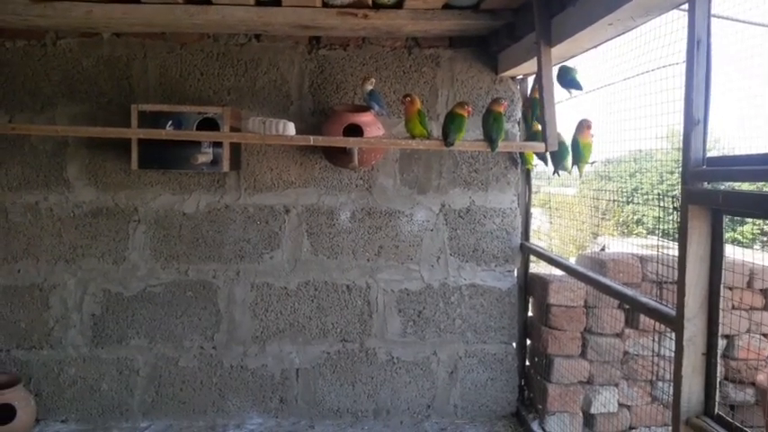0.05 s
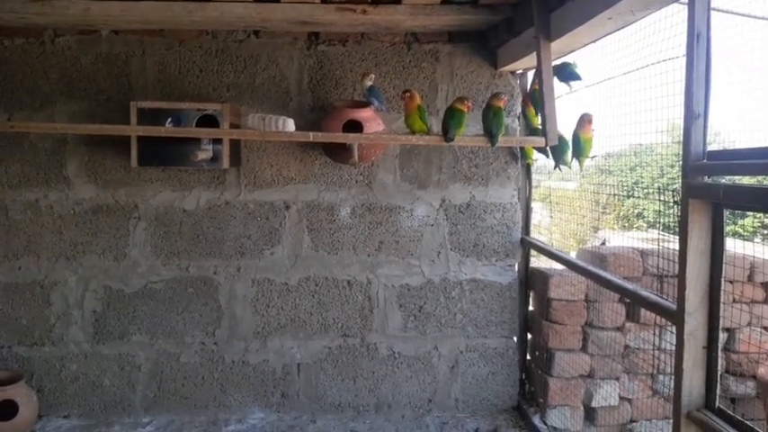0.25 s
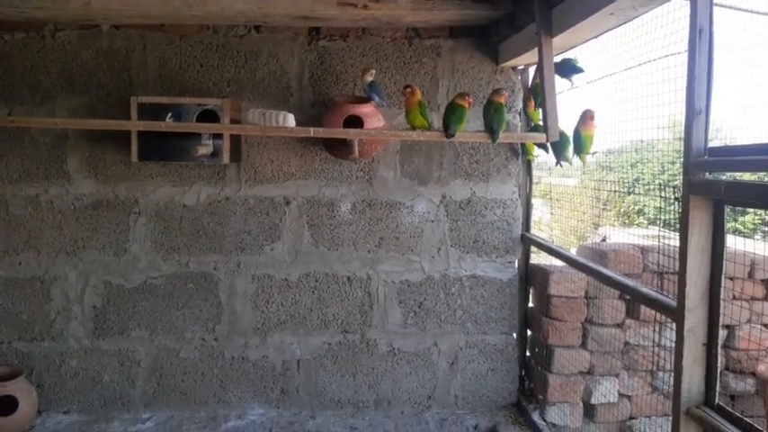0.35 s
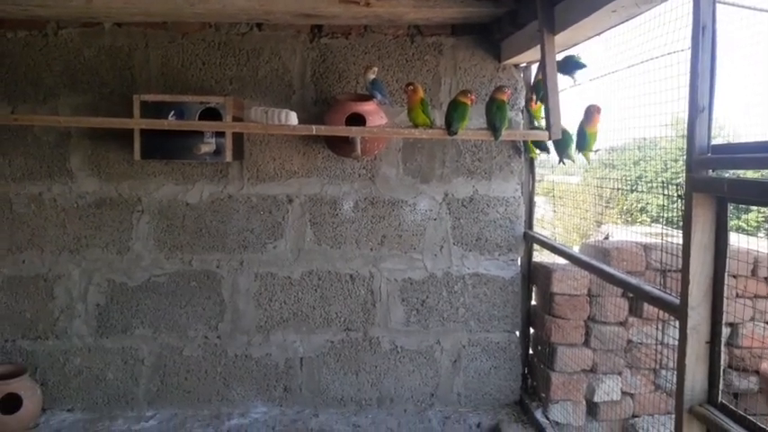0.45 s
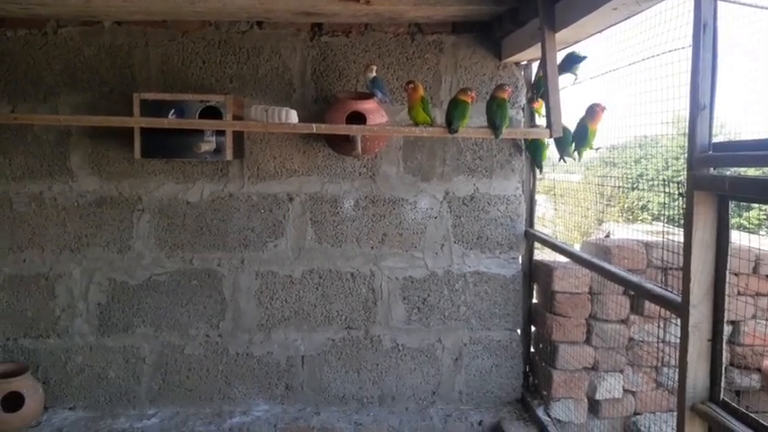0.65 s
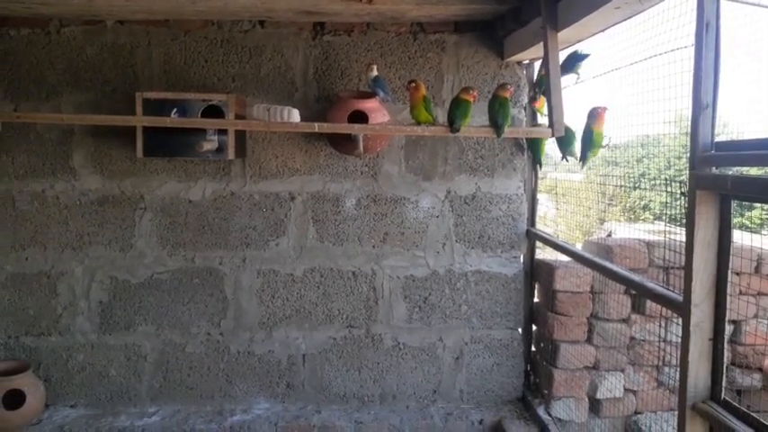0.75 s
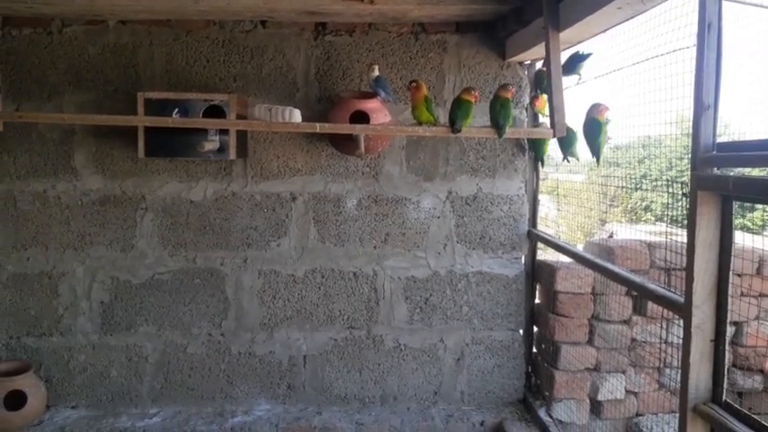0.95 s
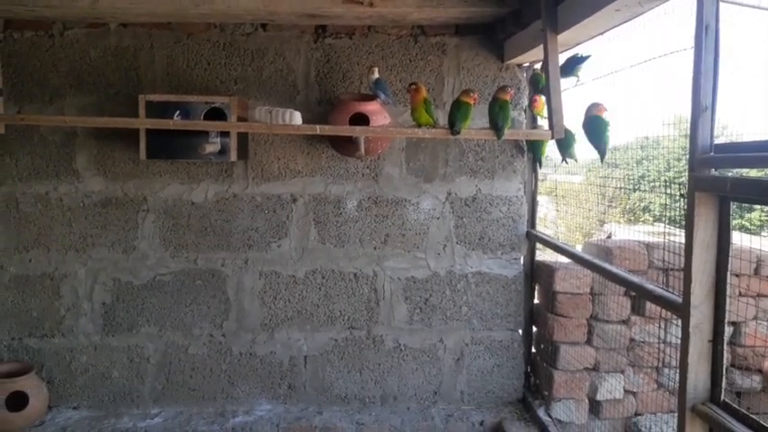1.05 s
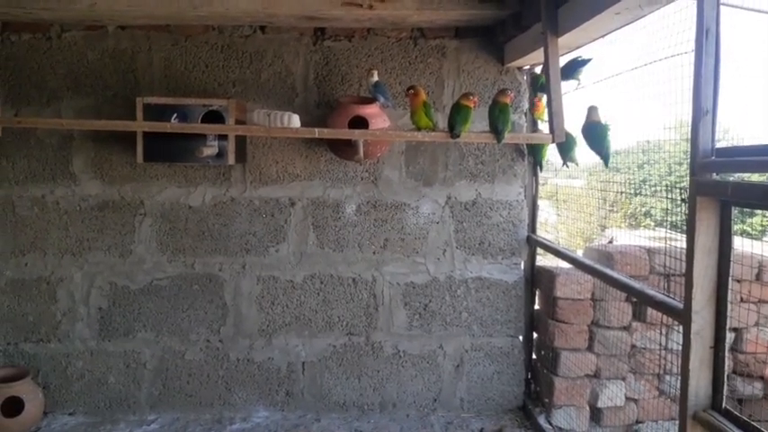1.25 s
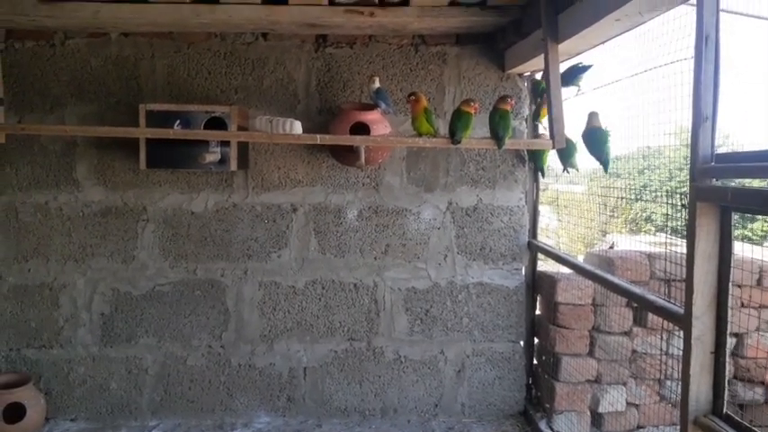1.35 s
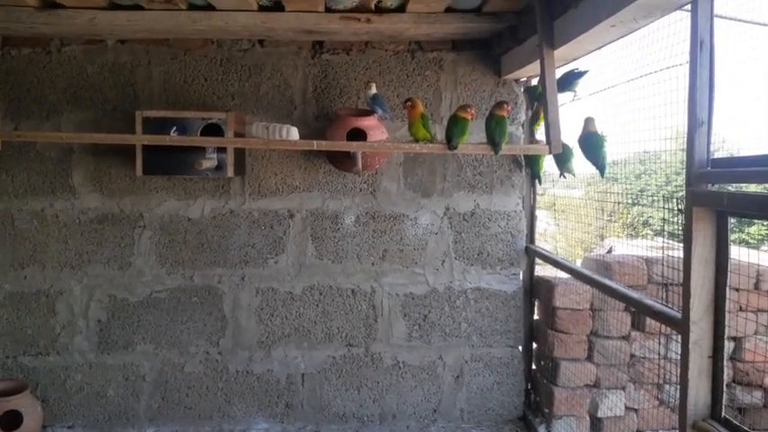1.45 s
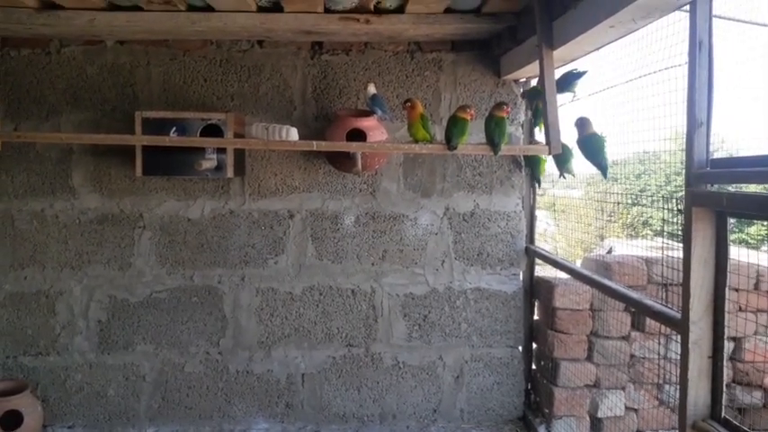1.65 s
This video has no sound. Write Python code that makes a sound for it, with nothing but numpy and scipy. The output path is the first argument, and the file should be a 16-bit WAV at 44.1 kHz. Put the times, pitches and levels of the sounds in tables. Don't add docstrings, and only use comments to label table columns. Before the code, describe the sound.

Small parrots on a perch to the right give clear tweets, then a dense burst of burry, hoarse chirps and shrill rising shrieks; they hush, leaving feather rustles and a distant squawk in a hard-walled aviary.

```python
import sys
import numpy as np
from scipy import signal
from scipy.io import wavfile
from scipy.ndimage import uniform_filter1d, minimum_filter1d

SR = 44100
rng = np.random.default_rng(int(sys.argv[2]) if len(sys.argv) > 2 else 0)


def volts_from_decibels(level):
    exponent = np.asarray(level, float) / 20
    return 10 ** exponent


def persist_wave(psi):
    counts = np.round(np.clip(psi, -1, 1) * 32767).astype(np.int16)
    wavfile.write(sys.argv[1], SR, np.atleast_2d(counts).T)


N = 74970


def rms_one(x):
    return x / np.sqrt(np.mean(x ** 2) + 1e-20)


def at_hz(points, hz):
    table_hz, value = np.array(points).T
    return np.interp(np.log(hz), np.log(table_hz), value)


def drift(rate_hz, order=2):
    run_in = 9000
    lowpass = signal.butter(order, rate_hz, fs=SR, output="sos")
    return rms_one(signal.sosfilt(lowpass, rng.standard_normal(N + run_in))[run_in:])


def gate(t, length, attack, release):
    return np.clip(t / attack, 0, 1) * np.exp(-np.maximum(t - length, 0) / release)


# frequency in Hz, left-right likeness (1 is mono).
LIKENESS = [(30, 0.6), (125, 0.95), (300, .6), (600, 0.5), (1500, 0.036), (15000, 0.036)]


def banded_noise(spectrum, patchy_db):
    out, white = 0, rng.standard_normal((2, 2, N))
    edges = 28 * 2 ** np.arange(0, 9.6, .5)
    for k, (low, high) in enumerate(zip(edges, edges[1:])):
        band = signal.butter(2, [low, high], "band", fs=SR, output="sos")
        mid, side = signal.sosfilt(band, white[k % 2])
        hz = np.sqrt(low * high)
        alike = np.clip(at_hz(LIKENESS, hz), -1, 1)
        gain = volts_from_decibels(at_hz(spectrum, hz) + patchy_db * drift(7.8))
        out = out + gain * (np.sqrt(1 + alike) * mid + np.sqrt(1 - alike) * side * [[1], [-1]])
    return rms_one(out)


# frequency in Hz, level in dB per Hz.
AIR_COLOUR = [(30, -13), (50, 1), (200, -9.5), (700, -9.5), (1500, -15), (3000, -25.5), (7000, -41),
              (15500, -31.5)]


def outdoor_air():
    return volts_from_decibels(-63.5) * banded_noise(AIR_COLOUR, patchy_db=4.5)


# frequency in Hz, level in dB.
HUM = [(50, -69), (100, -64.5), (200, -73)]


def mains_hum():
    t = np.arange(N) / SR
    return sum(volts_from_decibels(db + 0.83 * drift(6)) * np.sin(2 * np.pi * hz * t + 0.404 * drift(6)) for hz, db in HUM)


def cricket():
    t = np.arange(N) / SR
    pitch_hz, sag_hz_per_s, strokes_per_s = 4313, 8.5, 59.5
    phase = 2 * np.pi * np.cumsum(pitch_hz - sag_hz_per_s * t + 1.4 * drift(22)) / SR
    stroke = np.exp(-2j * np.pi * strokes_per_s * t)
    throb = 1 + .5 * stroke - .2 * stroke ** 2
    wing = throb * (volts_from_decibels(-69.5) * np.exp(1j * phase) + volts_from_decibels(-69) * np.exp(3j * phase))
    return np.array([wing.real, 0.3 * wing.imag])


# start in seconds, length in seconds, level in dB.
SWELLS = [
    (.0, 0.053, -63),
    (0.374, 0.41, -65.5),
    (0.877, 0.33, -63),
    (1.385, 0.3, -65),
]
# frequency in Hz, level in dB per Hz.
SWELL_COLOUR = [(60, -18.5), (150, 3.5), (300, -12), (600, -4), (1100, -23.5), (2000, -35.5),
                (15000, -64.5)]


def traffic_swells():
    t = np.arange(N) / SR
    level = sum(volts_from_decibels(db) * gate(t - start, length, 0.052, 0.02) for start, length, db in SWELLS)
    return level * banded_noise(SWELL_COLOUR, patchy_db=4.0)


# start in seconds,
# length in seconds, level in dB, brightest Hz.
RUSTLES = [(0.832, 0.048, -56.5, 3450), (0.96, 0.05, -73, 4956), (1.025, 0.06, -73, 5250),
           (1.107, 0.022, -57, 5860), (1.139, 0.027, -68.5, 5500), (1.368, 0.005, -62, 3410),
           (1.399, 0.017, -47, 5530), (1.43, 0.073, -56.5, 2780), (1.542, 0.058, -74, 4600),
           (1.621, 0.041, -63, 3460), (.0, 0.084, -54.5, 1800), (.62, 0.19, -69, 4565),
           (.88, .025, -68.5, 8670), (0.771, 0.436, -72, 2500), (1.5, 0.31, -72, 2600)]
# frequency in Hz, level in dB per Hz.
RUSTLE_COLOUR = [(500, -12), (1500, -7), (2500, -5), (6200, -5), (7500, -15), (10000, -20), (15500, -20)]


def rustles():
    t, out = np.arange(N) / SR, 0
    noise = volts_from_decibels(1.7 * drift(440)) * banded_noise(RUSTLE_COLOUR, patchy_db=4.5)
    for start, length, db, bright_hz in RUSTLES:
        bright = signal.lfilter(*signal.iirpeak(bright_hz, 2, fs=SR), noise)
        out = out + volts_from_decibels(db) * gate(t - start, length, 0.0048, 0.011) * (0.51 * noise + bright)
    return out


def voice(calls, overtones_db, glide, wobble, flutter_db, rough_hz, breath_db, left_db,
          fade_db=-5.0, attack=.002, throat=((1, 0), (2, 0))):
    t, out = np.arange(N) / SR, np.zeros(N)
    for start, length, first_hz, last_hz, db in calls:
        part = np.clip((t - start) / length, 0, 1)
        path_hz = last_hz + (first_hz - last_hz) * (1 - part) ** glide
        phase = 2 * np.pi * np.cumsum(path_hz * (1 + wobble * drift(rough_hz, order=4))) / SR
        tone = 0
        for k, overtone_db in enumerate(overtones_db, 1):
            tone = tone + volts_from_decibels(overtone_db + at_hz(throat, k * path_hz)) * np.cos(k * phase)
        air = volts_from_decibels(breath_db) * (1 + np.cos(phase)) * np.diff(rng.standard_normal(N + 1))
        level = volts_from_decibels(db + fade_db * part + flutter_db * drift(rough_hz, order=4))
        out += level * gate(t - start, length, attack, .004) * (tone + air)
    return out * volts_from_decibels(np.array([[left_db], [0]]))


# start in seconds, length in seconds, first pitch in Hz, last pitch in Hz, level in dB.
COO = [
    (.46, 0.29, 1021, 891, -56),
]


def far_coo():
    return voice(COO, [0, -30], .7, 0.0046, 4.8, 44, -72.5, 7.0, fade_db=-16.0, attack=0.035)


# start in seconds, length in seconds, first pitch in Hz, last pitch in Hz, level in dB.
SQUAWK = [
    (1.395, .016, 1724, 1681, -44.5),
    (1.404, .078, 1720, 1384, -49),
]
# frequency in Hz, gain in dB.
THROAT = [(1300, 2), (2800, 10), (4100, -2.5), (5400, 8), (7000, -7.5), (8500, -18), (12000, -21),
          (16000, -24.5)]


def far_squawk():
    onset_db = [-6.5, -9, 3.5, 9, 0, -11, 5.5, 2.5, 5.5]
    onset = voice(SQUAWK[:1], onset_db, 3.8, .02, 4.0, 450, -29.5, -12, throat=THROAT)
    fall = voice(SQUAWK[1:], [0] * 11, 7.1, 0.018, 4.95, 280, -17.5, -14.5, fade_db=-12.0, throat=THROAT)
    return onset + fall


# start in seconds, length in seconds, first pitch in Hz, last pitch in Hz, level in dB.
HOOT = [
    (.469, .011, 2150, 2110, -34),
]


def hoot():
    return voice(HOOT, [0, -40], 1.3, 0.0074, 0.58, 180, -65.5, -16)


# start in seconds, length in seconds, first pitch in Hz, last pitch in Hz, level in dB.
CHATTERS = [
    (.112, .022, 1500, 2551, -33.5),
    (.218, 0.025, 1890, 2539, -29.5),
    (.431, .024, 2490, 3200, -27),
    (.505, .07, 2290, 3093, -31),
]
CHATTER_DB = [0, -3.5, -11, -28, -21, -37]


def chatters():
    return voice(CHATTERS, CHATTER_DB, 3.0, 0.089, 1.61, 600, -32.5, -18.5, fade_db=1.5, attack=0.016)


# start in seconds, length in seconds, first pitch in Hz, last pitch in Hz, level in dB.
BURRS = [
    (.322, .03, 3600, 3500, -26),
    (.329, .038, 4150, 3700, -19),
    (.36, .045, 3650, 3420, -27),
    (.255, .03, 4250, 3950, -24),
    (.443, .047, 4150, 3880, -22),
    (.546, .038, 4850, 4550, -18),
    (.527, .04, 2550, 3050, -27),
]
BURR_DB = [3.5, -22, -27.5, -46.5]


def burrs():
    return voice(BURRS, BURR_DB, 1.4, .022, 2.7, 450, -57, -18, attack=0.014)


# start in seconds, length in seconds, first pitch in Hz, last pitch in Hz, level in dB.
TWEETS = [
    (.043, .032, 4400, 4050, -26),
    (.134, .034, 4300, 3980, -25),
    (-.02, .022, 4750, 4700, -45),
    (.307, .015, 1900, 1870, -50),
    (.488, .018, 3820, 3780, -25),
    (.585, .014, 4500, 4400, -19),
]
TWEET_DB = [5, -15.5, -22, -37]


def tweets():
    return voice(TWEETS, TWEET_DB, 1.6, 0.014, 2.1, 500, -52, -19.5)


# start in seconds, length in seconds, first pitch in Hz, last pitch in Hz, level in dB.
RASPS = [
    (.232, .03, 5200, 4300, -17),
    (.386, .022, 7300, 6700, -26),
    (.432, .04, 4700, 4200, -24),
    (.43, .018, 5900, 5200, -22),
]
RASP_DB = [4.5, -16.5, -18]


def rasps():
    return voice(RASPS, RASP_DB, 1.6, .07, 2.4, 900, -42.5, -21.5, fade_db=-8.0, attack=0.0082)


# start in seconds, length in seconds, first pitch in Hz, last pitch in Hz, level in dB.
SHRIEKS = [
    (.397, 0.037, 4360, 5950, -9),
    (.504, .018, 4410, 5875, -14),
    (.508, 0.029, 4530, 4820, -14),
    (.525, 0.021, 5785, 5820, -18.5),
]
SHRIEK_DB = [3.5, -17]


def shrieks():
    return voice(SHRIEKS, SHRIEK_DB, 4.636, .028, 4.6, 500, -26.5, -17.5, fade_db=-7.0, attack=0.011)


def aviary(x):
    t = np.arange(SR // 2) / SR
    early_t60_s, wall_t60_s = 0.083, 1
    noise = rng.standard_normal((2, 2, len(t)))
    sparse = rng.random((2, len(t))) < 500 * (1 + t / .02) / SR
    early = sparse * noise[0] * volts_from_decibels(-60 * t / early_t60_s) * (t > .002)
    late = noise[1] * volts_from_decibels(-60 * t / wall_t60_s) * (t > .01)
    tail = 0
    for echo, db in ((early, -4.5), (late, -36.5)):
        tail = tail + volts_from_decibels(db) * echo / np.sqrt(np.sum(echo ** 2, axis=1, keepdims=True))
    tail = signal.sosfilt(signal.butter(1, 9550, fs=SR, output="sos"), tail)
    tail = tail * volts_from_decibels(np.array([[-5], [0]]))
    return signal.fftconvolve(x[1:], tail, axes=1)[:, :N]


def ports(x):
    lag_s = 0.000099
    late = np.interp(np.arange(N) - lag_s * SR, np.arange(N), x[0])
    treble = signal.sosfilt(signal.butter(2, 8450, "high", fs=SR, output="sos"), late)
    return np.array([late + volts_from_decibels(3.5) * treble, x[1]])


def scene():
    near = hoot() + chatters() + burrs() + tweets() + rasps() + shrieks()
    calls = near + far_coo() + far_squawk()
    birds = ports(calls + aviary(calls))
    return outdoor_air() + mains_hum() + cricket() + traffic_swells() + rustles() + birds


def limiter(x):
    room = np.minimum(1, .93 / (np.abs(x).max(axis=0) + 1e-9))
    return x * uniform_filter1d(minimum_filter1d(room, size=89), size=45)


def roll_off(x):
    return signal.sosfilt(signal.butter(12, 15990, fs=SR, output="sos"), x)


def record(dry):
    peak_hz, peak_width_hz, low_cut_hz = 12600, 830, 51
    b, a = signal.iirpeak(peak_hz, peak_hz / peak_width_hz, fs=SR)
    x = dry + volts_from_decibels(10.5) * signal.lfilter(b, a, dry)
    x = signal.sosfilt(signal.butter(4, low_cut_hz, "high", fs=SR, output="sos"), x)
    mix = limiter(x)
    return roll_off(mix)


dry = scene()
out = record(dry)
persist_wave(out)
```